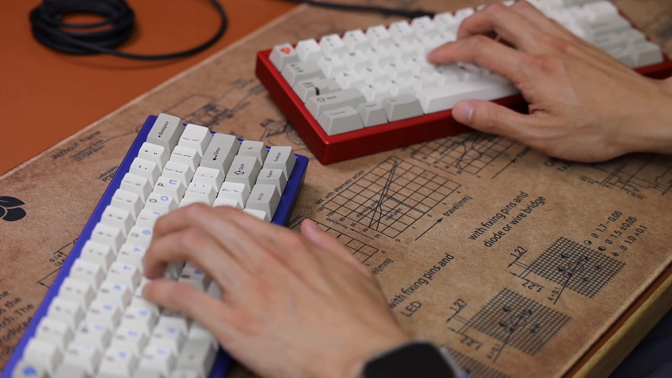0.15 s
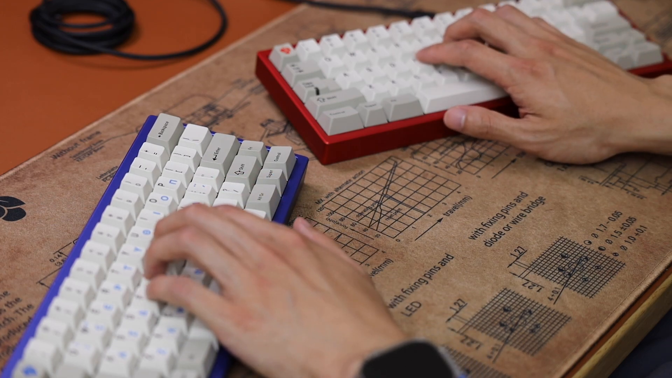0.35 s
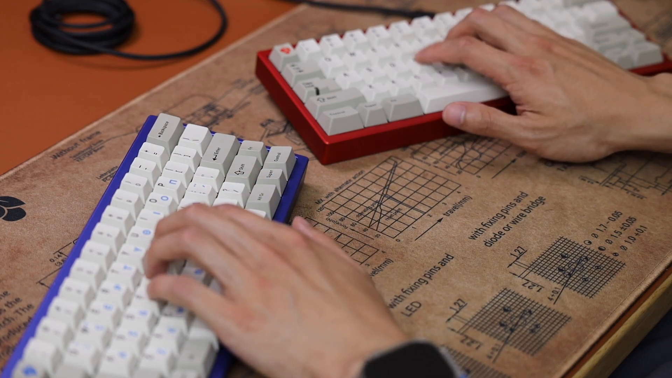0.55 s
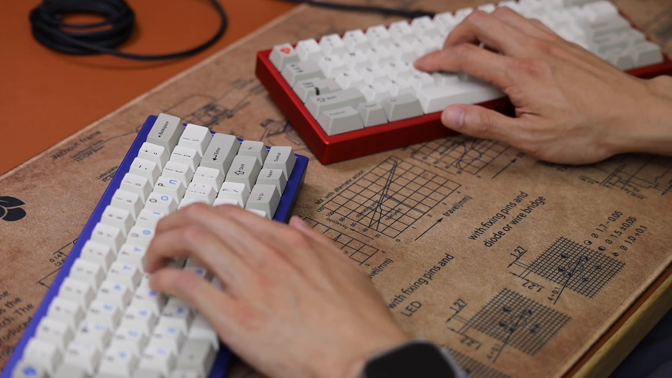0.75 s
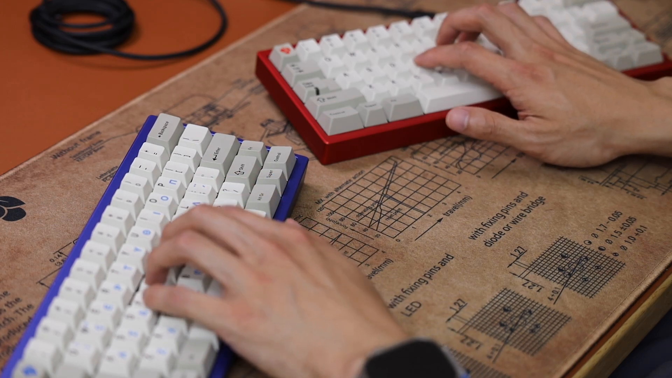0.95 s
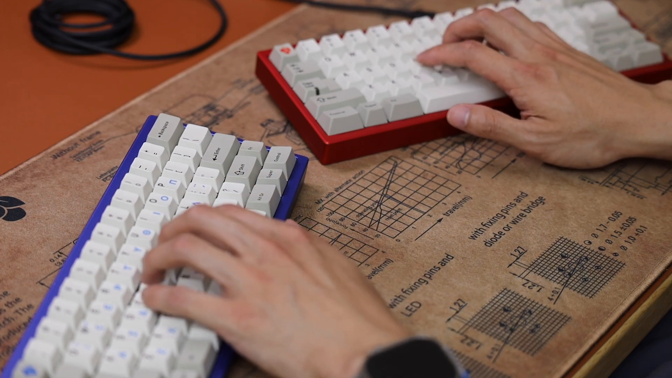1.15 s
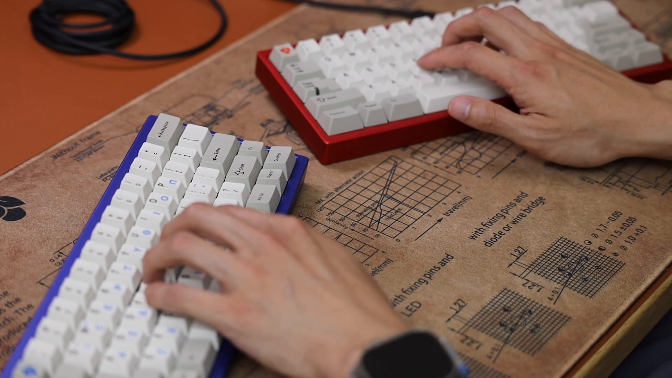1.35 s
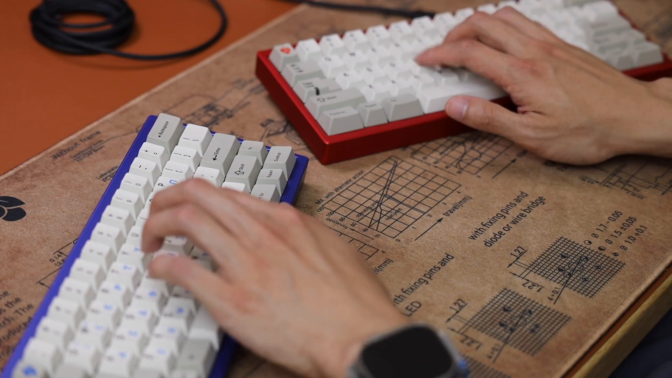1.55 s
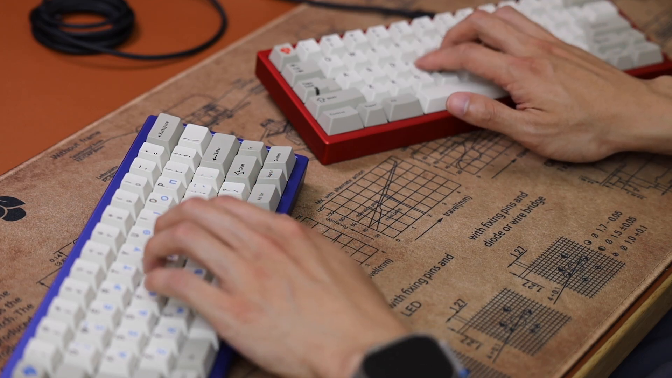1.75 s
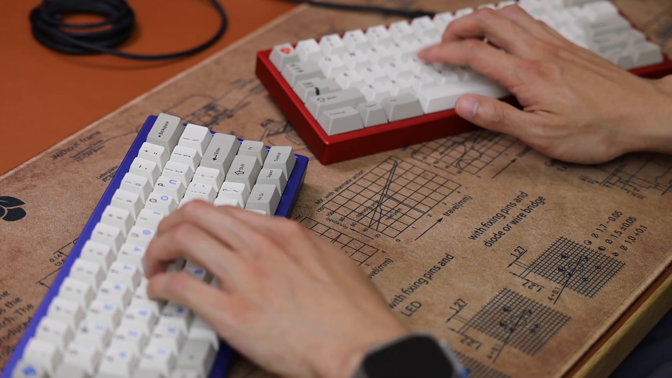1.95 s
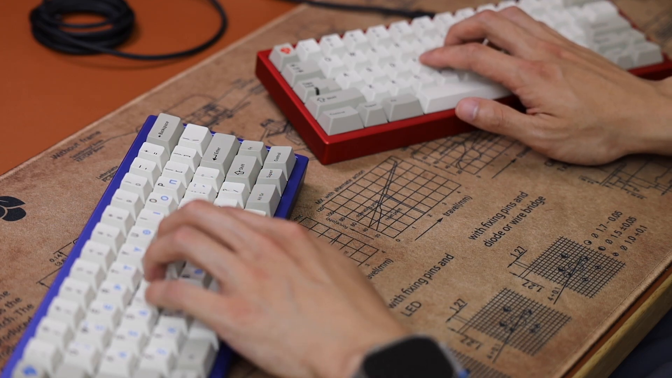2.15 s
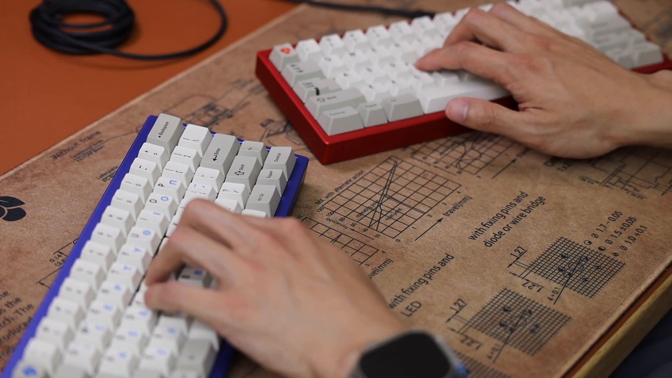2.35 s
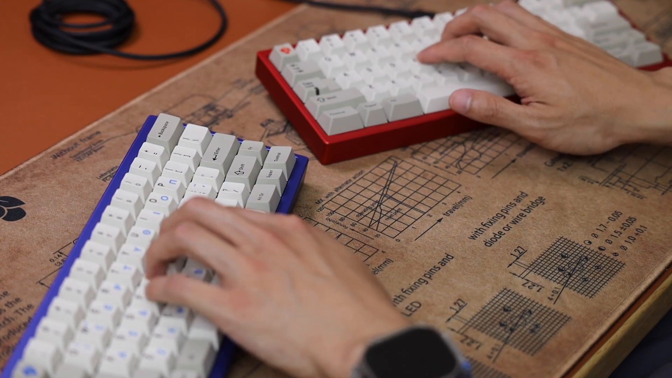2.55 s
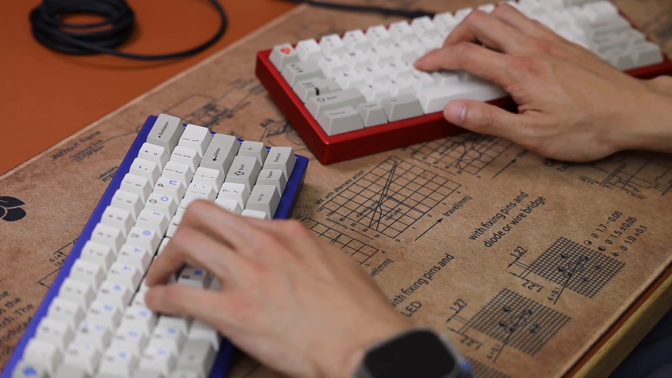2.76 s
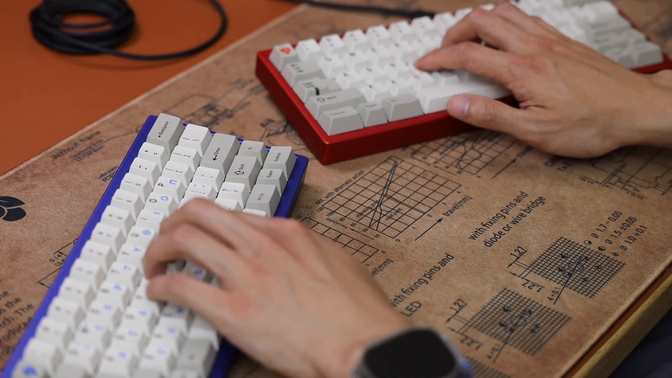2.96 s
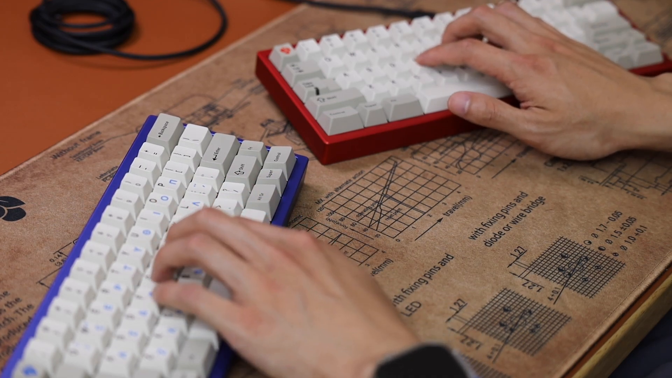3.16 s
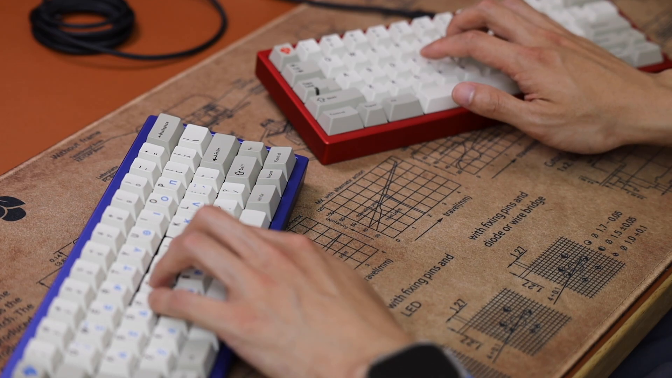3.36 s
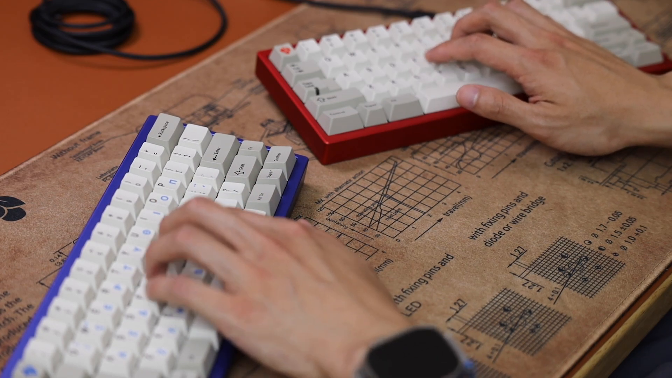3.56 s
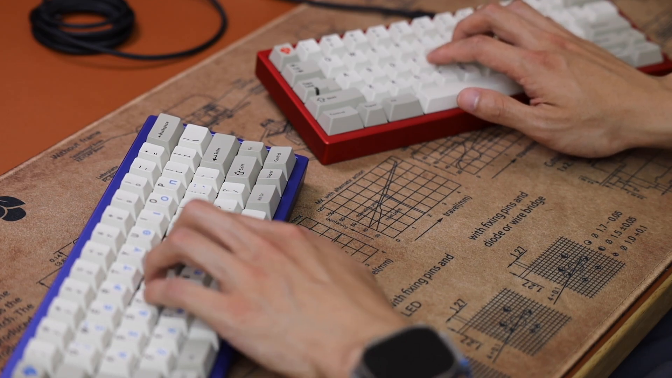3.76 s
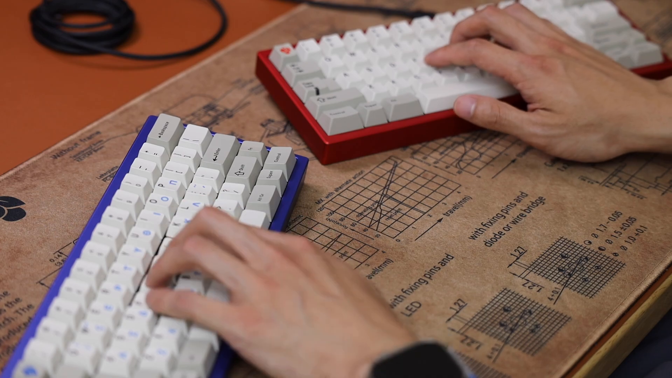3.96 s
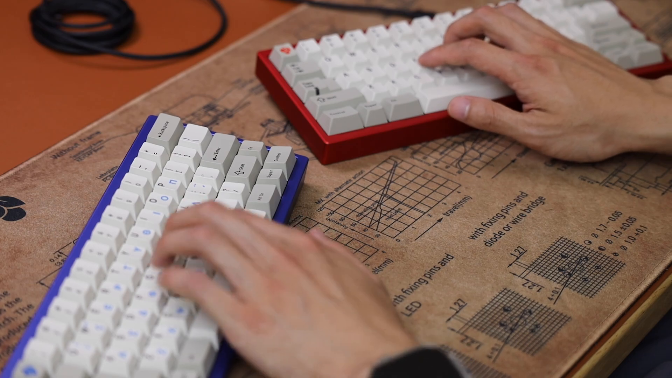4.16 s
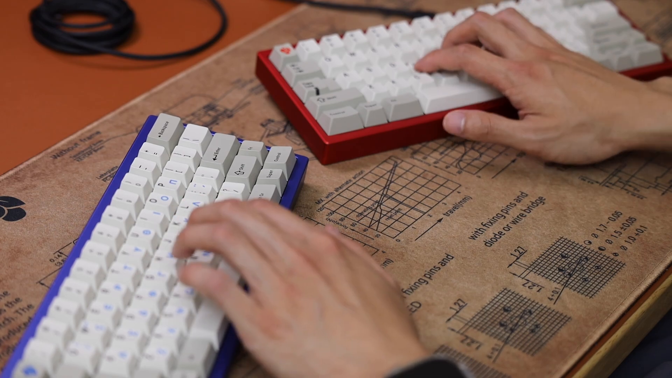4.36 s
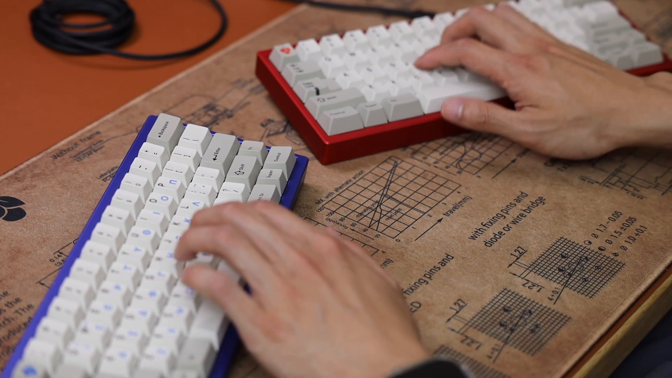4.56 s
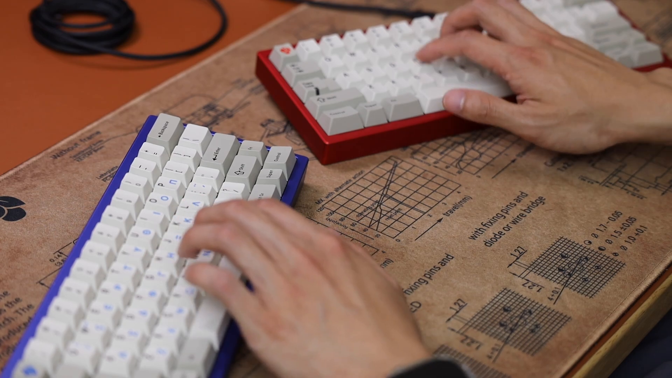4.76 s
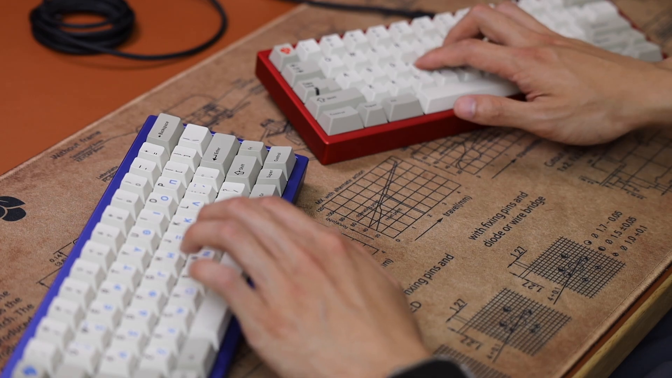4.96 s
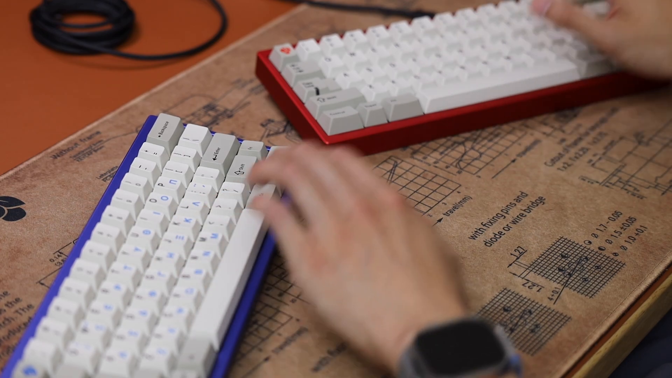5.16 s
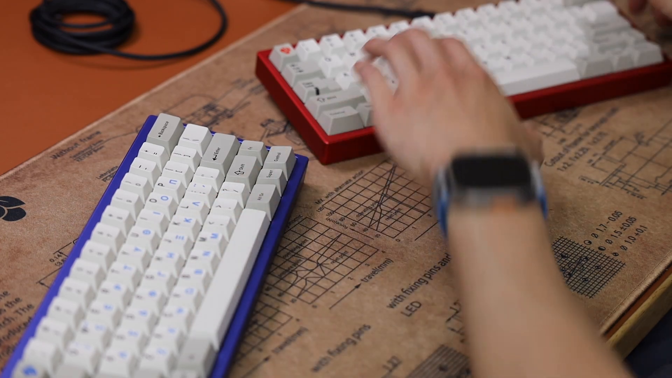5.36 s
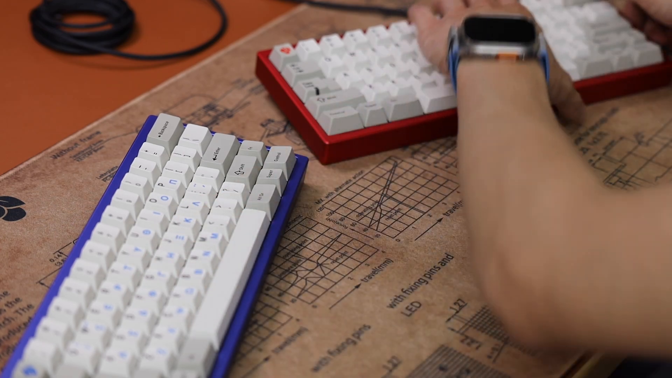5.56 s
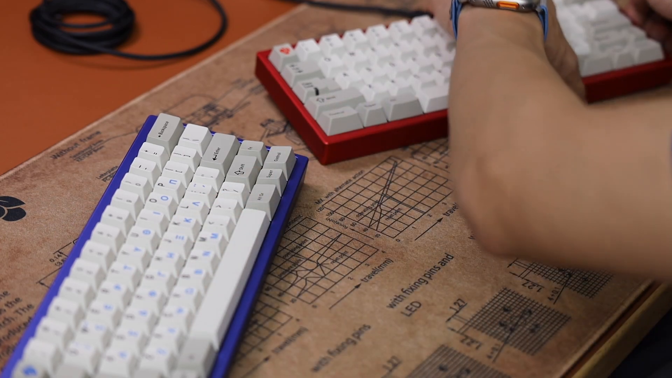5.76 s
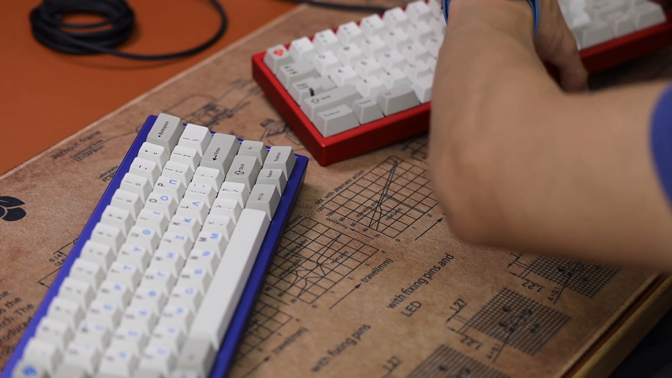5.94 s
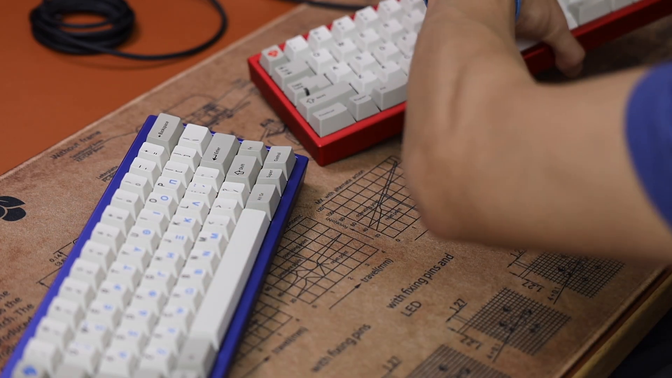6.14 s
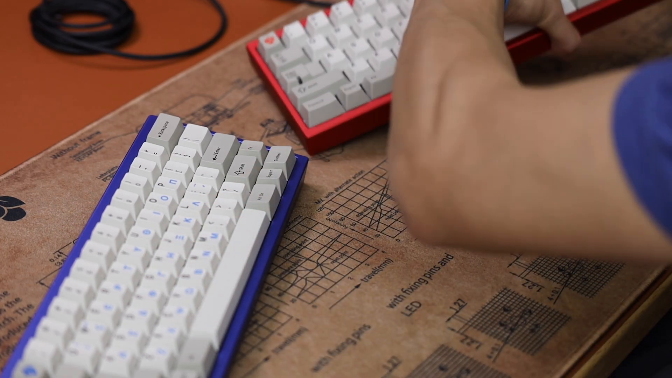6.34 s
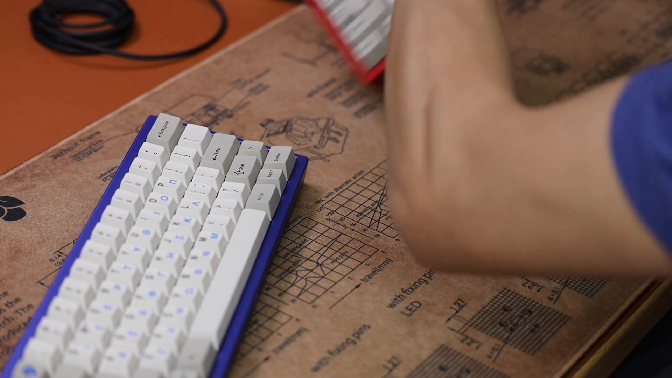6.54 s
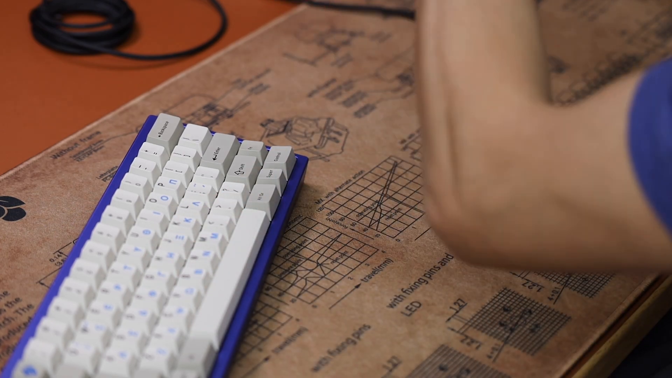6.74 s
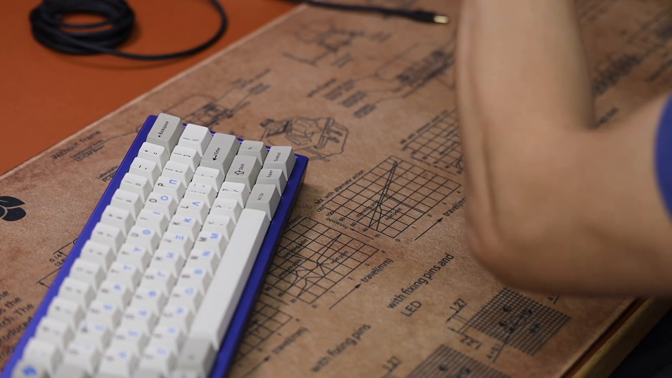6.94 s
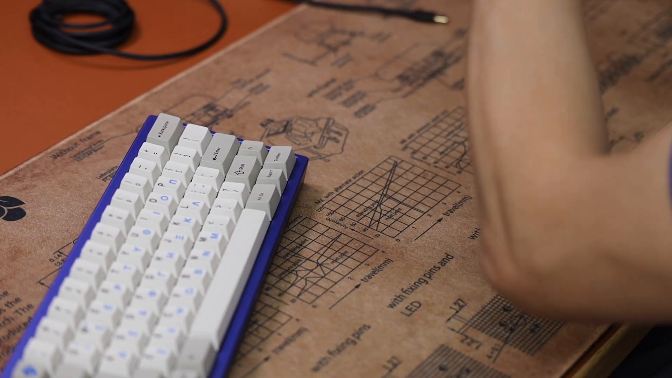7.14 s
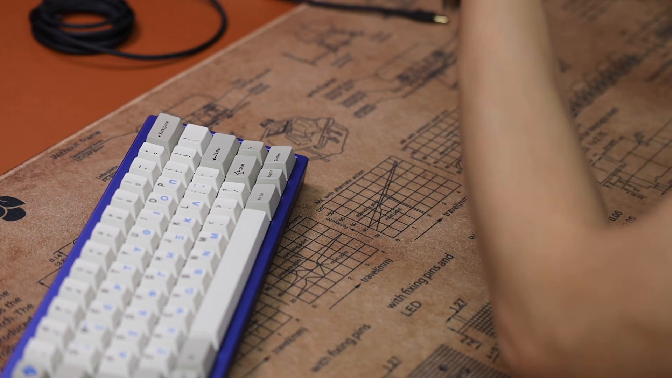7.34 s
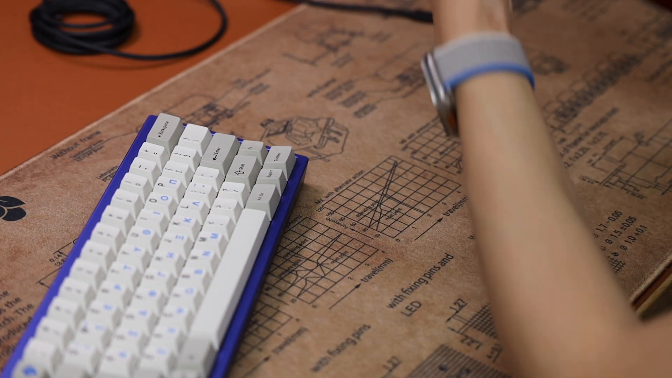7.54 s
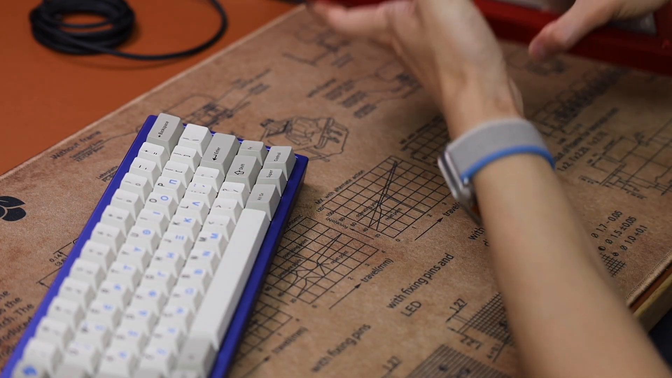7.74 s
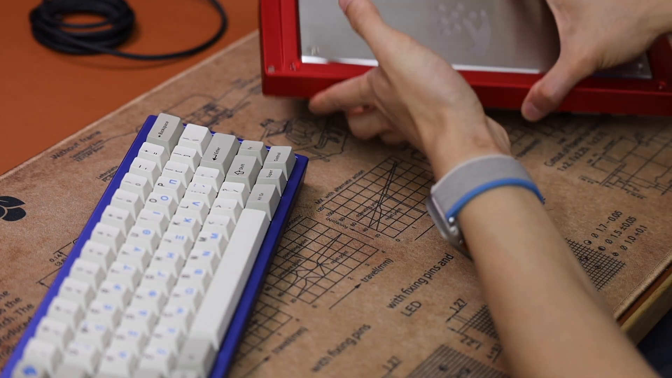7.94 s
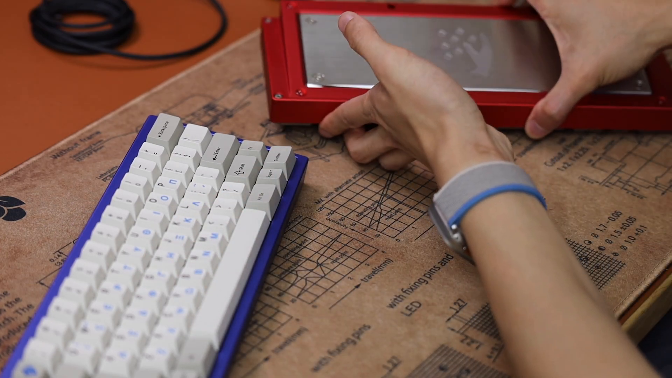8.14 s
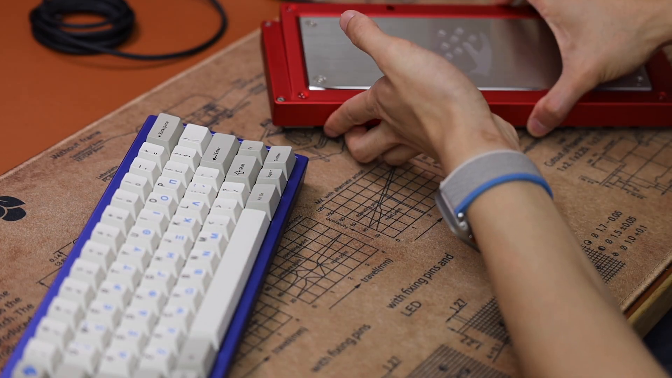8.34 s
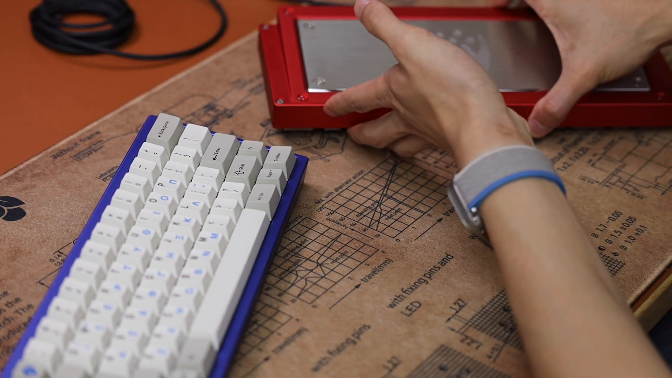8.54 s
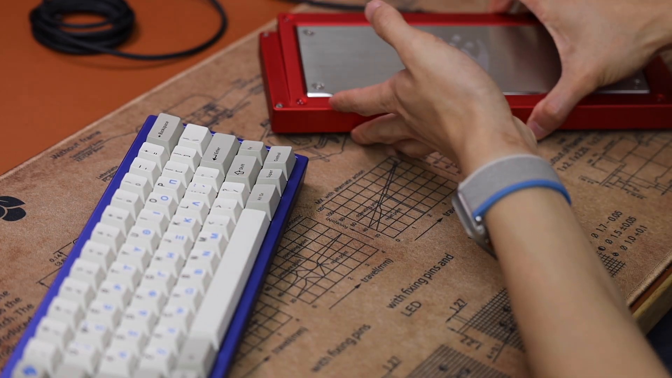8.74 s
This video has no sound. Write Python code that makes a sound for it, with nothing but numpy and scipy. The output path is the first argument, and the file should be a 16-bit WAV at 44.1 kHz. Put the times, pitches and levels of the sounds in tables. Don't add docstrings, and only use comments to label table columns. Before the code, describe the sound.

Fingers rattle quickly over two mechanical keyboards, then slap chords of keys harder, before one board is lifted with faint knocks in a small live room.

```python
import sys
import numpy as np
from scipy import signal
from scipy.io import wavfile
from scipy.ndimage import uniform_filter1d

SR = 44100
rng = np.random.default_rng(int(sys.argv[2]) if len(sys.argv) > 2 else 0)


def linear_from_db(decibels):
    return 10 ** (np.asarray(decibels, float) / 20)


def inscribe(sig):
    pcm = np.round(np.clip(np.atleast_2d(sig).T, -1, 1) * 32767)
    wavfile.write(sys.argv[1], SR, pcm.astype(np.int16))


N = 388064

# [t/s, peak level/dB, cap f/Hz, case level/dB]
DRUMMING = [(0.3714, -26.5, 3040, -5), (0.4329, -14.5, 3080, -6.5), (0.5104, -17, 2980, -7),
            (0.569, -17.5, 2770, -16), (0.574, -20, 2880, -13), (0.6326, -15.5, 3020, -7.5),
            (0.6915, -19, 3170, -2.5), (0.7433, -22, 2980, -5), (0.764, -16.5, 2940, -11),
            (0.8002, -14.5, 3120, -5.5), (0.9291, -17.5, 3400, -4.5), (0.998, -18.5, 3150, -16),
            (1.052, -19.5, 3260, -8), (1.13, -19, 3300, -8), (1.212, -16, 3450, -12),
            (1.2615, -19, 3240, -9), (1.2857, -20, 3050, -4.5), (1.3532, -12.5, 3180, -10.5),
            (1.3814, -20, 3160, -6), (1.4421, -19.5, 3340, -12), (1.4703, -21, 3150, -1),
            (1.5153, -19, 3300, -6.5), (1.5471, -19, 3200, -8), (1.5728, -16, 2830, -7.5),
            (1.577, -19, 3400, -11), (1.638, -17, 3300, 0.5), (1.7233, -20, 3180, -2),
            (1.742, -18, 2920, -13), (1.768, -21, 3060, -0.5), (1.8064, -16, 3150, -7.5)]
# [t/s, peak level/dB, cap f/Hz, case level/dB, tick level/dB]
SLAPS = [(2.2209, -14.5, 3100, -7.5, -18.5), (2.2498, -17.5, 3140, -5, -12),
         (2.2616, -22.5, 2960, -18, -13), (2.2645, -11, 3000, -7, -17.5), (2.268, -22, 3000, -18, -17),
         (2.6776, -20, 3250, -6, -17.5), (2.6893, -18.5, 3300, -3, -17), (2.6971, -16, 3180, -2, -9),
         (2.7015, -19, 3240, -8, -7), (2.7087, -8.5, 3400, -12, -22), (2.719, -13.5, 2720, -21, -13),
         (3.3265, -13.5, 3200, -11, -17), (3.3387, -14, 3100, -16, -14), (3.3457, -22.5, 3200, -5, -21),
         (3.3555, -18, 3080, -9, -20), (3.6383, -8, 3280, -15, -20), (3.6497, -19, 3230, 8.5, -3),
         (3.6555, -23, 2940, -15, -17)]
# [t/s, peak level/dB, cap f/Hz, case level/dB, tick level/dB]
LAST_SLAPS = [(3.93, -12, 3020, -8, -14.5), (3.9316, -10, 3000, -15, -12), (3.9441, -15, 3260, -10, -21),
              (3.9519, -20, 3220, -6, -6), (4.319, -17, 2980, -9, -21), (4.3283, -16.5, 3200, -22, -20),
              (4.3373, -6, 2980, -10, -14), (4.6032, -14, 3080, -3, -8), (4.6087, -17, 2920, -13, -14),
              (4.6107, -8, 2960, -13.5, -18), (4.829, -12.5, 2830, -8, -13.5),
              (4.8336, -6.5, 2800, -11.5, -16.5), (4.849, -21, 2920, 2, -8)]
# [t/s, peak level/dB, case level/dB]
RELEASES = [(0.0629, -30, -0.5), (0.132, -40, -6), (0.285, -37, 13), (0.7468, -26.5, 7), (1.1775, -31.5, 5),
            (1.8954, -29.5, 9), (1.9389, -42, 3), (2.275, -31, 3), (2.545, -29.5, 6), (2.556, -39, 8),
            (2.9319, -34, -2), (3.0039, -31, 7), (3.008, -37, -1), (3.04, -37, 2), (3.569, -26.5, -2),
            (3.86, -39, -4), (3.8673, -23.5, -7), (3.876, -35, -5), (4.16, -29, -2), (4.1632, -27, -2),
            (4.1672, -20, -7), (4.17, -28.5, -4), (4.515, -23.5, 5.5), (4.525, -29, 4), (4.7375, -21.5, 2),
            (4.744, -36, 7), (5.049, -25.5, 8), (5.055, -18, 1.5), (5.06, -25.5, 10), (5.0657, -25, 7.5)]
# [f/Hz, width/Hz, level/dB]
CASE_MODES = [(1217, 110, -5.5), (1700, 256, 0), (2140, 160, -2.5)]
# [f/Hz, width/Hz, level/dB]
TICK_MODES = [(4700, 1430, -1), (6710, 1000, 1), (8440, 1200, -6), (10110, 656, 2.5), (12820, 520, -8),
              (15060, 770, -17)]
# [t/s, peak level/dB, f/Hz, overtone f/Hz, overtone level/dB]
KNOCKS = [(5.601, -32.5, 1900, 3080, 1.5), (5.603, -40.5, 5500, 8950, -8), (5.607, -40, 1200, 3300, -6),
          (5.637, -33, 1910, 1210, -1.5), (5.89, -47, 700, 1200, -2), (5.966, -31, 380, 705, 2),
          (5.967, -36, 890, 3500, -12), (5.975, -36, 200, 605, -1), (5.984, -36, 90, 160, -9),
          (6.011, -38, 332, 60, 0), (6.284, -41, 1280, 2600, -2), (7.536, -41, 1480, 1000, -14),
          (7.544, -38, 2100, 3900, -6.5), (7.573, -40, 1700, 3000, -7), (7.643, -26.5, 1180, 1570, 2.5),
          (7.643, -33.5, 2140, 3180, -6), (7.676, -39, 1300, 2190, -5), (7.719, -29, 5220, 6500, -3),
          (7.721, -35.5, 2550, 3320, -5), (7.752, -36.5, 1540, 2100, 1), (8.497, -50, 3000, 4000, -6),
          (8.748, -35.5, 1020, 1800, -7.5), (8.75, -40.5, 340, 600, -14)]
# [f/Hz, width/Hz, level/dB]
CRACK = (2200, 3240, -22)
# [t/s, peak level/dB]
THUMPS = [(0.434, -42.5), (0.51, -41), (0.569, -34.5), (0.639, -40), (0.766, -32.5), (0.799, -46),
          (1.13, -55), (1.573, -33.5), (1.639, -48), (1.74, -38), (1.805, -39), (2.267, -34),
          (2.712, -33.5), (4.32, -38), (4.339, -27.5), (4.606, -28), (4.831, -34), (5.057, -43.5),
          (5.968, -34)]
# [f/Hz, level/dB per Hz]
RUB_COLOUR = [(410, -51), (700, -14), (1240, -7), (1570, -10.5), (2240, -6), (14100, -21), (16500, -28.5)]
# [f/Hz, t60/s]
ROOM_T60 = [(150, 0.62), (700, 0.88), (1840, 0.5), (4850, 0.49), (12800, 0.38)]
# [f/Hz, level/dB per Hz]
AIR_COLOUR = [(24, -45), (40, -18), (85, -2), (118, -8), (324, -5), (624, -9.5), (2040, -16), (16500, -29)]
# [f/Hz, correlation/1]
LIKENESS = [(40, 0.89), (150, 0.82), (300, 0.72), (600, 0.66), (1500, 0.1), (5000, 0), (15000, 0)]
# [f/Hz, left minus right/dB]
BALANCE = [(60, -0.5), (380, -1.5), (2380, -2.5), (15000, 0.5)]
# [f/Hz, width/Hz, level/dB]
WHINE = (1222, 14.2, -69.5)

WALL_S = 0.0052


def strokes():
    drum_tick_db, drum_wall_db = -18, -5
    slap_wall_db = -3
    release_hz, release_tick_db, release_wall_db = 3150, -16.5, -6
    drummed = [(*row, drum_tick_db, drum_wall_db) for row in DRUMMING]
    slapped = [(*row, slap_wall_db) for row in SLAPS + LAST_SLAPS]
    released = [(s, db, release_hz, case_db, release_tick_db, release_wall_db)
                for s, db, case_db in RELEASES]
    return drummed + slapped + released


def keys():
    cap_width_hz = 602
    direct, echo, sent = np.zeros((3, N))
    for s, db, cap_hz, case_db, tick_db, wall_db in strokes():
        modes = [(cap_hz, cap_width_hz, 0)]
        modes += [(f, w, case_db + d) for f, w, d in CASE_MODES]
        modes += [(f, w, tick_db + d) for f, w, d in TICK_MODES]
        chance = rng.standard_normal((2, 60))
        pulse = click(modes, 0.4 * chance[0], size=1024)
        reflected = click(modes, 0.49 * chance[1], size=1024)
        hidden_db = 0.67 * min(db + 19.5, 0)
        hidden_db -= 0.12 * max(db + 16, 0)
        add(sent, s, linear_from_db(db) * pulse)
        add(direct, s, linear_from_db(db + hidden_db) * pulse)
        delay_s = WALL_S * (1 + 0.022 * chance[1, 0])
        add(echo, s + delay_s, linear_from_db(db + min(wall_db, 0)) * reflected)
    return direct, echo, sent


def knocks():
    out = np.zeros(N)
    for s, db, hz, over_hz, over_db in KNOCKS:
        width_hz = 75 + 0.095 * hz
        modes = [(hz, width_hz, 0), (over_hz, width_hz, over_db), CRACK]
        add(out, s, linear_from_db(db) * click(modes, 0.41 * rng.standard_normal(80)))
    return out


def desk():
    desk_hz, t60_s, swell_s = 139.8, 0.33, 0.0037
    mode_shares = [(1, 0.76), (1.33, 0.42), (0.604, 0.21), (1.62, 0.29)]  # f/desk_hz, amplitude
    out, t = np.zeros(N), np.arange(SR // 2) / SR
    low_band = signal.butter(2, [60, 300], "bandpass", fs=SR, output="sos")
    rumble = evened(signal.sosfilt(low_band, rng.standard_normal(N + SR)))
    for s, db in THUMPS:
        boom = 0.24 * rumble[round(s * SR):][:len(t)]
        for ratio, share in mode_shares:
            phase = 2 * np.pi * rng.random()
            boom = boom + share * np.sin(2 * np.pi * ratio * desk_hz * t + phase)
        envelope = linear_from_db(db - 6 - 60 * t / t60_s) * (1 - np.exp(-t / swell_s))
        add(out, s, envelope * boom)
    return out


def rub():
    start_s, db, rise_s, hold_s, sag_db, fall_db_per_s = 6.246, -50.5, 0.04, 0.14, -2.5, 190
    t = np.arange(N) / SR - start_s
    level_db = db - 30 * np.clip(1 - t / rise_s, 0, 3)
    level_db += sag_db * np.clip((t - rise_s) / hold_s, 0, 1)
    level_db -= fall_db_per_s * np.clip(t - rise_s - hold_s, 0, 1)
    grain = linear_from_db(1.3 * evened(uniform_filter1d(rng.standard_normal(N), size=60)))
    return linear_from_db(level_db) * grain * noise(RUB_COLOUR, [(100, 0.5), (16000, 0.22)], patchy_db=-1.5)


def room(x, count=3):
    size, spacing, out = 30000, 20, np.zeros((2, N))
    turn = 2 * np.pi * 3.7 * np.arange(N) / SR
    for k in range(count):
        slots = np.arange(60, size - spacing, spacing)
        at = slots + rng.integers(0, spacing, (2, len(slots)))
        spread_db = 4.0 + 2.33 * np.exp(-at / 2500)
        bounces = rng.choice([-1., 1.], at.shape) * linear_from_db(spread_db * rng.standard_normal(at.shape))
        taps = np.zeros((2, size))
        np.put_along_axis(taps, at, bounces, 1)
        taps[1] += 0.39 * signal.lfilter([0.3], [1, -0.7], taps[0])
        hz, t, z = signal.stft(taps, SR, nperseg=128)
        build_up = 1 + 0.5 * np.exp(-t / 0.02)
        decay = linear_from_db(-60 * t / read(ROOM_T60, hz)[:, None])
        tail = signal.istft(z * build_up * decay, SR, nperseg=128)[1]
        tail *= np.clip(np.arange(tail.shape[1]) / 110 - 0.5, 0, 1)
        tail /= np.linalg.norm(tail, axis=1, keepdims=True)
        share = np.sqrt(2 / count) * np.cos(turn + np.pi * k / count)
        out += signal.oaconvolve((x * share)[None], tail, axes=1)[:, :N]
    return out


def air():
    wash_db = -54
    hz, width_hz, tone_db = WHINE
    wander = evened(uniform_filter1d(rng.standard_normal(N), size=4000))
    tone = np.sin(2 * np.pi * np.cumsum(hz + width_hz * 0.301 * wander) / SR)
    return linear_from_db(wash_db) * noise(AIR_COLOUR, LIKENESS, patchy_db=1.77) + linear_from_db(tone_db) * tone


def click(modes, ripple, size=2048):
    hz = abs(np.fft.fftfreq(size, 1 / SR))
    power = sum(linear_from_db(2 * db) / (1 + ((hz - f) / (1.726 * w)) ** 2) ** 3.7 for f, w, db in modes)
    power += linear_from_db(2 * -40) / (1 + (hz / 5000) ** 4)
    log_gain = np.log(power) / 2
    log_gain += np.interp(hz, np.linspace(0, SR / 2, len(ripple)), ripple)
    minimum_phase = np.exp(np.conj(signal.hilbert(log_gain)))
    pulse = np.fft.ifft(minimum_phase).real[:size // 2]
    return pulse / abs(pulse).max()


def noise(colour, likeness, patchy_db):
    frames, hz = N // 256 + 5, np.fft.rfftfreq(1024, 1 / SR)
    a, b, c, d, patches = rng.standard_normal((5, len(hz), frames))
    patches = uniform_filter1d(patches, size=10, axis=0)
    patches = evened(uniform_filter1d(patches, size=14, axis=1))
    same = np.clip(read(likeness, hz), -1, 1)[:, None]
    left = a + 1j * b
    right = same * left + np.sqrt(1 - same ** 2) * (c + 1j * d)
    level_db = read(colour, hz)[:, None] + patchy_db * patches
    side_db = np.multiply.outer([0.5, -0.5], read(BALANCE, hz))[..., None]
    z = np.array([left, right]) * linear_from_db(level_db + side_db)
    return evened(signal.istft(z, nperseg=1024, noverlap=768)[1][:, :N])


def evened(x):
    return x / np.sqrt(np.mean(x ** 2) + 1e-20)


def read(points, hz):
    f, value = np.transpose(points)
    return np.interp(np.log(hz + 1), np.log(f + 1), value)


def add(mix, s, sound):
    part = mix[max(round(s * SR), 0):][:len(sound)]
    part += sound[:len(part)]


def masked(x, from_hz=10900, below_db=-32):
    hz, _, z = signal.stft(x, SR, nperseg=1024)
    power = (abs(z) ** 2).mean(0)
    loudest = power[(hz > 2300) & (hz < 3900)].mean(0)
    band = (np.arange(len(hz)) // 16)[:, None] == np.arange(33)
    band_power = band.T @ power / band.sum(0)[:, None]
    jitter = rng.standard_normal((33, len(loudest) // 4 + 1))
    jitter = np.repeat(jitter, 4, axis=1)[:, :len(loudest)]
    weak = band_power < loudest * linear_from_db(2 * (below_db + 2.5 * jitter))
    kept = 1 - (band @ weak) * (hz > from_hz)[:, None]
    return signal.istft(z * kept, SR, nperseg=1024)[1][:, :N]


def scene():
    direct, echo, sent = keys()
    taps = knocks()
    echo = echo + linear_from_db(-2.5) * np.roll(taps, round(WALL_S * SR))
    earlier = np.zeros(N)
    earlier_modes = [(3000, 780, 0.0), (1800, 540, -8), (6500, 1300, -14.5), (10100, 580, -11)]
    add(earlier, 0, linear_from_db(-21.5) * click(earlier_modes, np.zeros(2)))
    near = (direct + taps) * linear_from_db([[-0.9], [0.9]])
    near[0] = np.roll(near[0], 1)
    wall = np.array([echo, np.roll(echo, 1)]) * linear_from_db([[-0.8], [0.8]])
    wet = linear_from_db([[3.5], [5.5]]) * room(sent + linear_from_db(1) * taps + earlier)
    return near + wall + wet + desk() * linear_from_db([[-0.4], [0.4]]) + rub() + air()


def low_pass(x):
    return signal.sosfilt(signal.butter(12, 16650, fs=SR, output="sos"), x)


def record(dry):
    bass_cut = signal.butter(2, 45, "highpass", fs=SR, output="sos")
    dry = signal.sosfilt(bass_cut, dry)
    band_limit = signal.firwin(511, 16450, window=("kaiser", 9), fs=SR)
    dry = signal.oaconvolve(dry, band_limit[None], "same")
    mix = masked(dry)
    return low_pass(mix)


dry = scene()
out = record(dry)
inscribe(out)
```